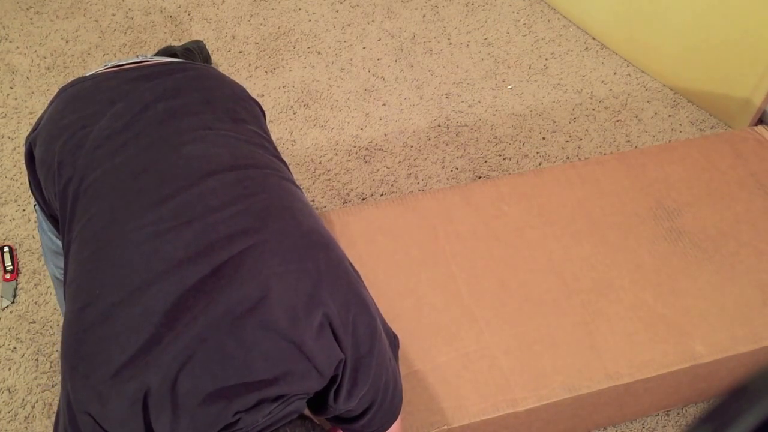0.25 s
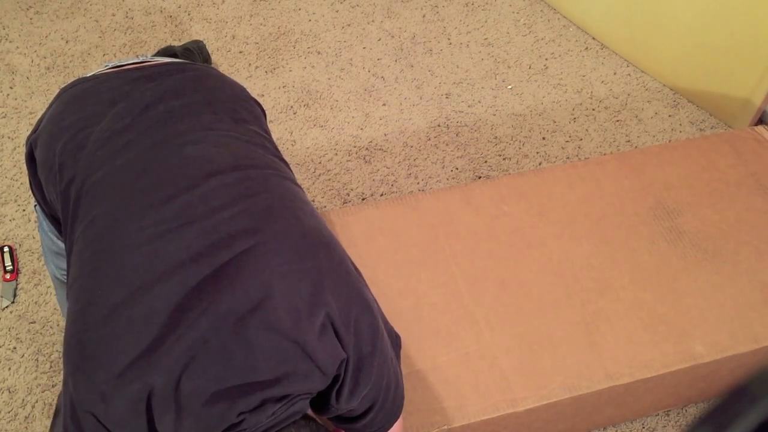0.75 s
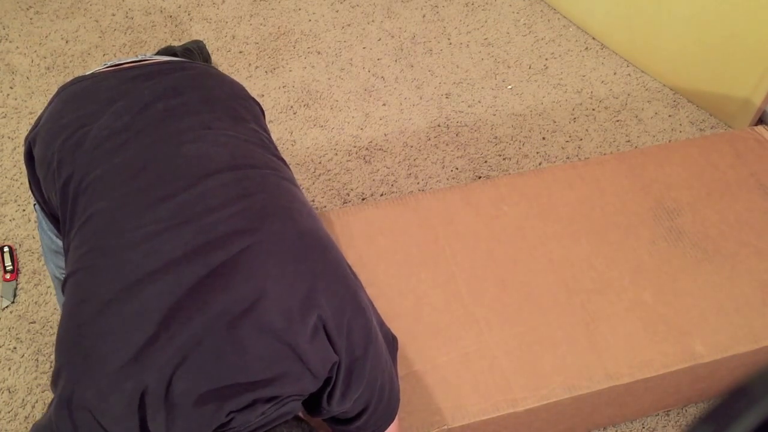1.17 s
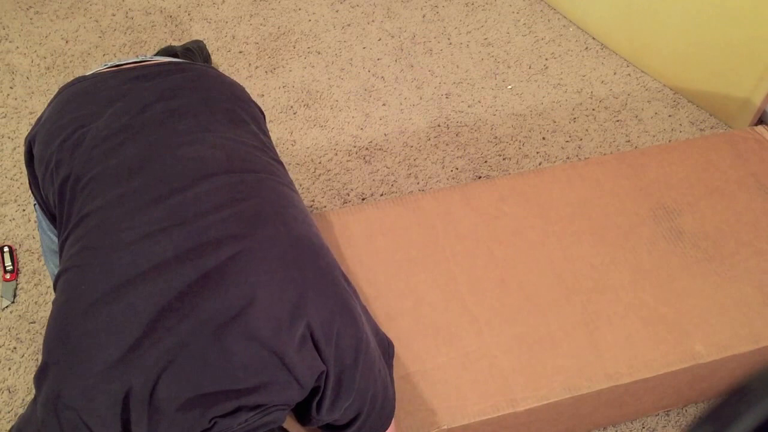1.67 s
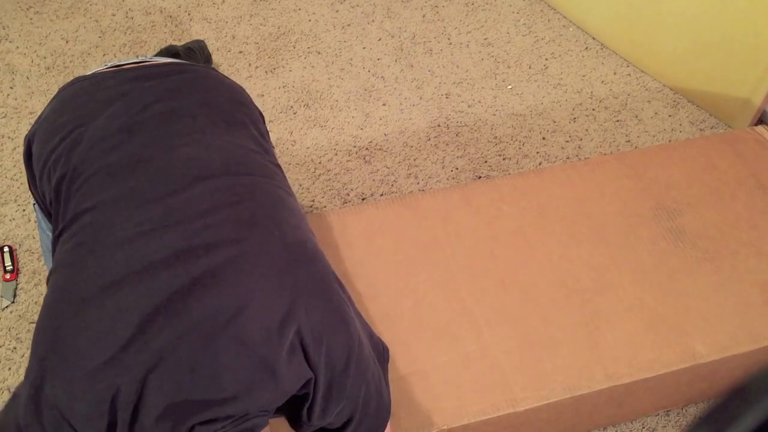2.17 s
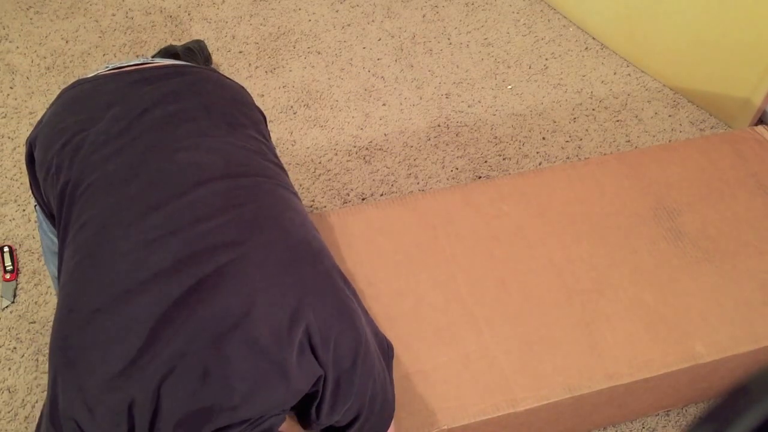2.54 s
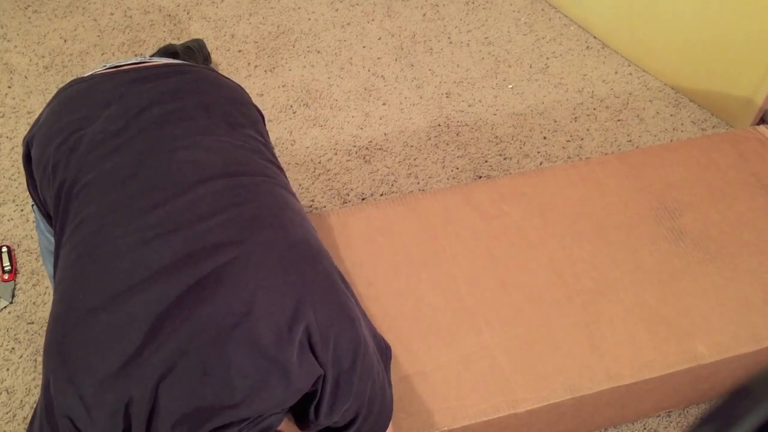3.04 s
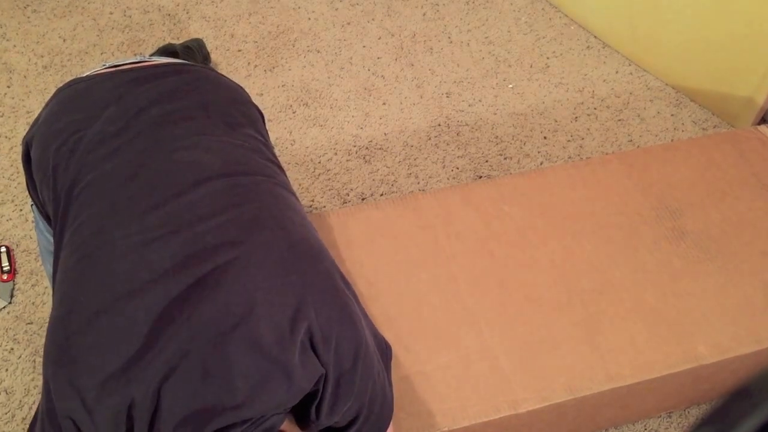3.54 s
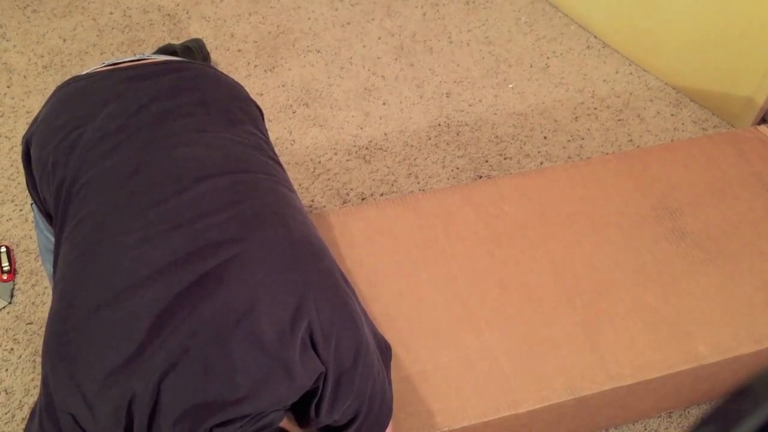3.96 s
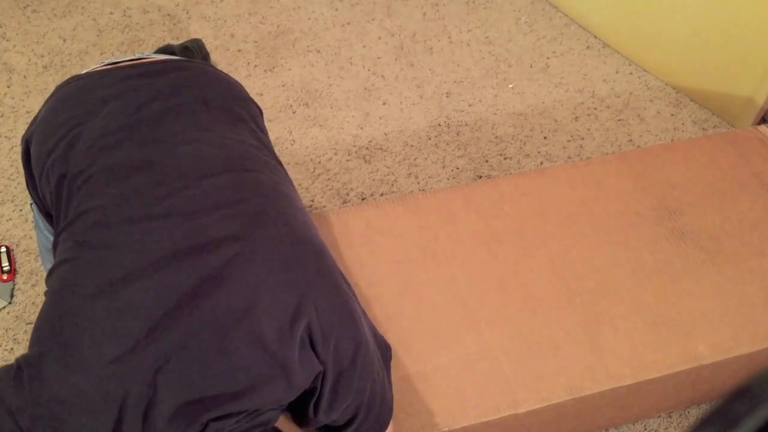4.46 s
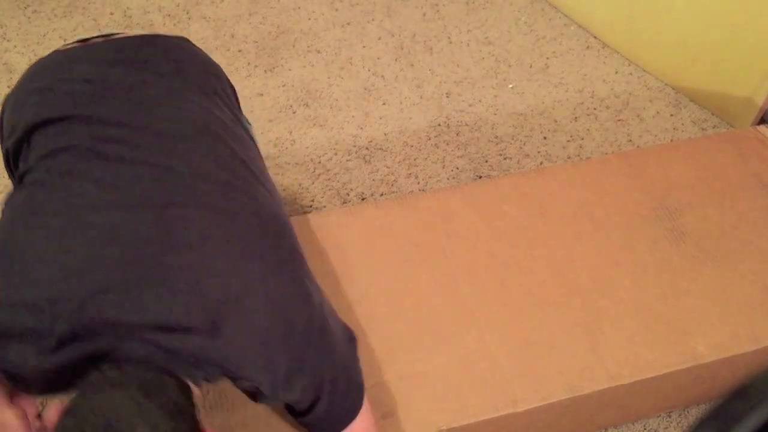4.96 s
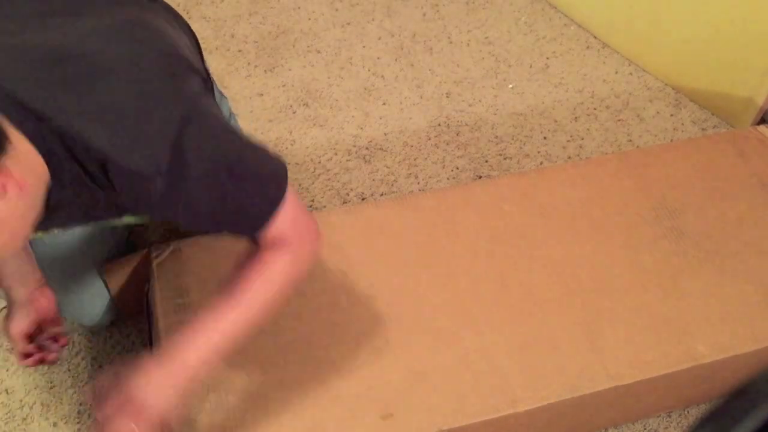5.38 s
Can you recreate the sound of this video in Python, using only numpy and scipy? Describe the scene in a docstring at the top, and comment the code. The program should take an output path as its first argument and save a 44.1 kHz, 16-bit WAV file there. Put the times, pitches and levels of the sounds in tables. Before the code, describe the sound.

Close, dry indoor capture of packing tape being pulled from a long cardboard box. Faint bumps and weak peels come first, then crisp rips just after one second, sparse ticks, a soft deep thump near the middle, a stuttering run of snaps and the loudest tears around four seconds. Loose tape then crinkles brightly. A faint engine drones outside beneath low room hiss.

```python
"""Packing tape is ripped off a long cardboard box in a carpeted room, in smooth pulls and in jerks.
Random slips of the glue crack in the film, rattle the stiff flap and drum on the hollow box.
Soft pushes make the hands bump the board, fine grain makes them scrape, and the arm's tugs sway the box.
Loose tape crinkles in small ringing buckles. A faint engine, two wavering tones, drones far outside,
over the soft hiss and rumble of the room, made from coloured noise."""
import sys
import numpy as np
from scipy import signal
from scipy.fft import rfft, irfft, next_fast_len
from scipy.io import wavfile
from scipy.ndimage import map_coordinates

SR = 44100
rng = np.random.default_rng(int(sys.argv[2]) if len(sys.argv) > 2 else 0)


def put_to_file(sound):
    """Save the sound as 16-bit audio at rate SR, in the file named by the first command-line argument."""
    columns = np.atleast_2d(sound).T  # one column per channel
    safe = np.clip(columns, -1, 1)
    whole_steps = np.round(safe * 32767)
    wavfile.write(sys.argv[1], SR, whole_steps.astype(np.int16))


N = 247842  # length of the scene in samples

# the tape peels in one surge: (start [s], length [s], film level [dB], swell over the surge [dB],
# flap, lid and hollow levels [dB re film], the arm's tug level [dB])
PULL_MOVES = [(0.551, 0.14, -58, -3, -11.5, -10, -0.5, -75), (0.703, 0.094, -47.5, 6, -11, -5.5, -1, -50),
              (0.825, 0.077, -46, 6, -9.5, -4, -3, -61), (1.198, 0.059, -35.5, 4.5, -2, -9, -11, -46),
              (1.268, 0.13, -34.5, -2.5, -8.5, 0.5, -13, -49), (1.668, 0.03, -50, 5, -3, -2, -12, -75),
              (1.711, 0.074, -35, 11.5, -7.5, -4, -13.5, -58),
              (1.82, 0.015, -40, 6, -7.5, -10.5, -11.5, -44), (2.645, 0.052, -51, 3, -16, -5, -12, -75),
              (3.389, 0.03, -39, 3, -11, 4, -11, -58), (3.54, 0.18, -43.5, 0.5, -10.5, -5, -2.5, -42.5),
              (4.141, 0.08, -24.5, 3, 0, 1, -4.5, -49), (4.294, 0.095, -27, 5.5, -7, -6, -8, -47)]
# resonances of the hollow box, the lowest one first: (frequency [Hz], width [Hz], relative level [dB])
HOLLOW_MODES = [(53, 2.2, 2), (76, 9.3, -4), (104.7, 7.3, -2), (141, 21.6, 2.5), (193.9, 24.6, 0)]
# resonances of the lid: (frequency [Hz], width [Hz], relative level [dB])
LID_MODES = [(271, 31.3, 1), (333, 59.4, 0), (445, 80, -2), (556, 72, -3.5), (756, 330, -23.5)]
# tone colour of the stiff flap: (frequency [Hz], relative level [dB])
FLAP_COLOUR = [(300, -11), (620, -16), (730, -5), (850, 5.5), (950, -0.5), (1080, 1), (1300, 1), (1550, -6),
               (2200, -6), (2800, -7), (5000, -19.5), (9000, -44.5)]
# tone colour of the tape film: (frequency [Hz], relative level [dB])
FILM_COLOUR = [(600, -29), (1800, -1.5), (2700, -4), (4200, -1), (5500, -0.5), (7000, 0.5), (8200, -3.5),
               (9600, -1.5), (10500, -5.5), (13000, -3.5), (15500, -9.5)]


def amp(db):
    """Turn decibels into a gain."""
    return 10 ** (np.asarray(db) / 20)


def unit(x):
    """Scale a sound to an average (rms) strength of 1."""
    return x / np.sqrt(np.mean(x ** 2) + 1e-20)


def along(points, hz):
    """Read (frequency [Hz], value) points at any frequency, on a log axis."""
    point_hz, value = np.transpose(points)
    return np.interp(np.log(hz + 1), np.log(point_hz + 1), value)


def wobble(rate):
    """A smooth random curve with this many random points a second."""
    knots = rng.standard_normal(int(N * rate / SR) + 4)
    return map_coordinates(knots, [np.arange(N) * rate / SR])


def add(track, s, sound):
    """Mix a sound into a track at time s."""
    part = track[max(round(s * SR), 0):][:len(sound)]
    part += sound[:len(part)]


def through(x, response):
    """Play x through a body, given that body's answer to one click."""
    return signal.fftconvolve(x, response)[:len(x)]


def colour(points, size=2048):
    """Answer to a click with the given spectrum: it starts at once and has energy 1."""
    level_db = along(points, np.fft.rfftfreq(size, 1 / SR))
    # folding the cepstrum forward in time puts the energy as early as possible (minimum phase)
    cepstrum = irfft(np.log(amp(level_db) + 1e-6))
    cepstrum[1:size // 2] *= 2
    cepstrum[size // 2 + 1:] = 0
    response = irfft(np.exp(rfft(cepstrum)))
    return response / np.linalg.norm(response)


def ringing(modes):
    """Answer to a click of (frequency, width, level) resonances, energy 1; wider ones die sooner."""
    t = np.arange(SR // 2) / SR
    response = np.zeros(len(t))
    for k, (hz, width, db) in enumerate(modes):
        decay = width * np.exp(-np.pi * width * t)
        response += (-1) ** k * amp(db) * decay * np.cos(2 * np.pi * hz * t)
    return response / np.linalg.norm(response)


def slips(rate, scatter_db, clump_rate, clump_db):
    """Tiny random releases, rate a second, of uneven size that come in clumps, rms 1."""
    hit = rng.random(N) < rate / SR
    scatter = scatter_db * np.clip(rng.standard_normal(N), -2, 2)
    clumps = clump_db * np.clip(wobble(clump_rate), -2, 2)
    direction = np.sign(rng.standard_normal(N))
    return unit(hit * direction * amp(scatter + clumps))


def stroke(s, length, db, swell_db, attack, release_db_per_s):
    """Gain of one movement of the hand: a short attack, an even swell, then a release."""
    t = np.arange(N) / SR - s
    swell = swell_db * (np.clip(t / length, 0, 1) - .5)
    release = release_db_per_s * np.maximum(t - length, 0)
    return np.clip(t / attack, 0, 1) * amp(db + swell - release)


def jerk(t60, crack, rate, size=8192):
    """One release, then a dying run of smaller, uneven slips; the briefer the run, the harder the crack."""
    sizes = 0.21 * np.clip(rng.laplace(size=size), -2.5, 2.5)
    fading = amp(-60 * np.arange(size) / SR / t60)
    run = (rng.random(size) < rate / SR) * sizes * fading
    run[0] = crack * (0.05 / t60) ** 0.66  # equals crack when the run dies by 60 dB in 0.05 s
    return run


def air():
    """Steady room tone: noise given the colour of the room."""
    # tone colour of the quiet room: (frequency [Hz], relative level [dB])
    quiet_colour = [(15, -24), (25, -15.5), (77, -18.5), (188, -24.5), (305, -26), (495, -36), (826, -37.5),
                    (895, -42.5), (997, -35), (1110, -42), (2010, -41.5), (9300, -50), (15500, -55)]
    return amp(-64.5) * unit(through(rng.standard_normal(N), colour(quiet_colour)))


def engine():
    """Only the lowest two orders pass the walls; the engine settles to idle, then climbs evenly."""
    # loudness of the lower tone before its small random wobble: (time [s], level [dB])
    drone_level = [(0, -64), (0.8, -60.5), (2.1, -62), (3.25, -50.5), (5.62, -72.5)]
    idle_hz, over_idle_hz, settle_s = 55.3, 11, 0.27
    pickup_s, climb_hz_per_s = 2.4, 9.6
    t = np.arange(N) / SR
    settling = over_idle_hz * np.exp(-t / settle_s)
    climb = climb_hz_per_s * np.maximum(t - pickup_s, 0)
    hz = idle_hz + settling + climb
    phase = 2 * np.pi * np.cumsum(hz * (1 + 0.0097 * wobble(2.0))) / SR
    first_db = np.interp(t, *np.transpose(drone_level)) + 1.0 * wobble(4)
    second_db = -73 + 1.8 * wobble(1.3)
    # the root of 2 makes these levels rms levels
    return np.sqrt(2) * (amp(first_db) * np.sin(phase) + amp(second_db) * np.sin(2 * phase))


def room(x, wet_db, count=26):
    """Board and walls answer within milliseconds; the answer drifts between random tails at a steady pace."""
    # how long the room rings: (frequency [Hz], time to die by 60 dB [s])
    decay_times = [(100, 0.34), (260, 0.25), (700, 0.18), (1840, 0.2), (4850, 0.25), (12800, 0.24)]
    hop = N // count + 1
    fade = np.sin(np.pi * np.arange(2 * hop) / (2 * hop))  # the squares of overlapping fades add up to 1
    padded = np.pad(x, (hop, 2 * hop))
    out = np.zeros(len(padded))
    # each tail is noise that dies at its own speed in each frequency band
    hz, t, bands = signal.stft(rng.standard_normal((count + 1, SR // 3)), SR, nperseg=256)
    fading = amp(-60 * t / along(decay_times, hz)[:, None])
    tails = signal.istft(bands * fading, SR, nperseg=256)[1]
    # near surfaces answer first and strongest
    tails *= 1 + np.exp(-np.arange(tails.shape[1]) / SR / 0.0023)
    for k, tail in enumerate(tails):
        piece = padded[k * hop:][:2 * hop] * fade
        add(out, k * hop / SR, signal.fftconvolve(piece, tail / np.linalg.norm(tail)))
    wet = amp(wet_db) * out[hop:hop + N]
    return (x + wet) / np.hypot(1, amp(wet_db))


def bumps():
    """A soft push on the box; the softer it is, the fewer resonances it reaches."""
    # (time [s], level before the gain below [dB], hardness as a cut-off before a 1 % rise [Hz])
    pushes = [(0.209, -42.5, 124), (0.313, -41, 380), (0.337, -58, 186), (0.358, -38, 182),
              (2.415, -29, 126), (2.794, -19.5, 180), (3.13, -36, 353), (3.953, -26.5, 108)]
    force, t = np.zeros(N), np.arange(SR // 20) / SR
    for s, db, hz in pushes:
        push = t * np.exp(-2 * np.pi * hz * 1.01 * t)
        add(force, s, amp(db + 24.0) * push / push.sum())
    hollow = through(force, ringing(HOLLOW_MODES))
    lid = through(amp(5.5) * force, ringing(LID_MODES))
    flap = through(amp(-2.0) * force, colour(FLAP_COLOUR))
    return hollow + lid + flap


def scrapes():
    """Skin drags over the board in many tiny slips, a fine grain."""
    # hands slide on the board: (start [s], length [s], level [dB], swell over the slide [dB])
    slides = [(0.319, 0.025, -57, 6), (2.42, 0.089, -53.5, 13)]
    # tone colour of the rubbed board: (frequency [Hz], relative level [dB])
    rubbed_colour = [(120, -34), (330, -2.5), (520, -3.5), (750, -11.5), (1050, -8), (1800, -16.5),
                     (3000, -27), (7000, -32), (15000, -42)]
    strength = sum(stroke(*slide, attack=0.012, release_db_per_s=422) for slide in slides)
    grain = slips(rate=3500, scatter_db=3, clump_rate=150, clump_db=3)
    return through(strength * grain, colour(rubbed_colour))


def loose_tape():
    """Each buckle rings a facet of the strip; fine creases crackle in between once it is balled up."""
    # loose tape buckles: (time [s], level before the gains below [dB], ring [Hz],
    # bright edge before its gain [dB re ring], time for the run-on to die by 60 dB [s])
    buckles = [(0.095, -65, 3170, -18, 0.038), (0.492, -76, 2280, 15, 0.073), (1.027, -62, 3340, 15, 0.081),
               (1.148, -52, 2360, -22, 0.077), (1.1713, -39, 2390, -13, 0.18), (1.587, -48, 2780, -9, 0.13),
               (1.6688, -50, 3760, 4, 0.031), (2.0128, -57, 3100, -21, 0.03), (2.05, -60, 3620, 1, 0.077),
               (2.392, -46, 1680, -12, 0.029), (3.086, -67.5, 2320, 11, 0.15),
               (4.5533, -42.5, 2750, 7.5, 0.11), (4.5923, -32.5, 3570, -6, 0.024),
               (4.658, -46, 2430, -15.5, 0.018), (4.7178, -47.5, 1600, -14.5, 0.015),
               (4.732, -42, 2860, -7, 0.036), (4.7916, -37.5, 2560, -8, 0.022),
               (4.825, -40, 3300, -9, 0.016), (4.8391, -42, 3650, -2.5, 0.0098),
               (4.896, -51, 2510, 3, 0.02), (4.9701, -53, 2000, 0, 0.028),
               (5.008, -55.5, 2800, -12.5, 0.03), (5.061, -45.5, 2150, 7.5, 0.058),
               (5.1622, -47, 2170, -11, 0.031), (5.3373, -55.5, 2425, 9, 0.053),
               (5.5916, -43, 2290, -19.5, 0.18)]
    # tone colour of the creasing loose tape: (frequency [Hz], relative level [dB])
    crease_colour = [(290, -39), (500, -24.5), (676, -13), (803, -12), (1560, -8), (1750, -8), (2500, 1),
                     (3380, -0.5), (4910, -6.5), (12000, -16.5), (15500, -24.5)]
    facet_width_hz, facet_gain_db, edge_gain_db = 750, 23.5, 21.5
    crumple_s = 4.55  # from here on the strip is balled up
    attack_s, release_db_per_s = 0.014, 294
    facets, edges = np.zeros((2, N))
    creasing = stroke(crumple_s, 0.63, -58.5, -3.5, attack_s, release_db_per_s)
    for s, db, hz, edge_db, t60 in buckles:
        run = jerk(t60, crack=0.72, rate=1800)
        ring = through(run, ringing([(hz, facet_width_hz, 0)]))
        add(facets, s, amp(db + facet_gain_db) * ring)
        add(edges, s, amp(db + edge_db + edge_gain_db) * run)
        if s >= crumple_s:  # fine creases trail each buckle of the balled strip
            creasing += stroke(s, attack_s, db - 5.5, 0, attack_s, release_db_per_s)
    creases = creasing * slips(rate=650, scatter_db=4, clump_rate=110, clump_db=9.0)
    return facets + through(edges, colour(FILM_COLOUR)) + through(creases, colour(crease_colour))


def tugs():
    """The arm's unsteady force sways the whole box in its lowest mode, however loud the tape is."""
    force = np.zeros(N)
    for s, length, *_, tug_db in PULL_MOVES:
        force += stroke(s, length, tug_db, 0, attack=0.034, release_db_per_s=298)
    return force * unit(through(rng.standard_normal(N), ringing(HOLLOW_MODES[:1])))


def carton(film, flap, lid, hollow):
    """Each force is heard through its own body; the board is mixed in with opposite sign to the film."""
    board = through(flap, colour(FLAP_COLOUR))
    board += through(lid, ringing(LID_MODES))
    board += through(hollow, ringing(HOLLOW_MODES[1:]))  # the lowest mode is left to the tugs and bumps
    return through(film, colour(FILM_COLOUR)) - board


def stutter(count=6):
    """The tape catches and slips at an even beat, hardest past the middle; the board shakes unevenly."""
    start_s, period_s, peak_s, half_s = 3.4668, 0.0388, 3.61, 0.25
    peak_db, sag_db = -30.5, 4.5  # the level sags by sag_db at half_s away from the peak
    scatter_db = 2.5 * rng.standard_normal((count, 2))
    rows = []  # same columns as the jerks in snaps()
    for k, (flap_db, box_db) in enumerate(scatter_db):
        s = start_s + k * period_s
        db = peak_db - sag_db * ((s - peak_s) / half_s) ** 2
        rows.append((s, db, -0.5 + flap_db, 3.5 + box_db, 0.061))
    return rows


def snaps():
    """A jerk cracks the film and shakes the board; the briefer it is, the harder its first crack."""
    # the tape lets go with a jerk and runs on: (time [s], film level before the gains below [dB],
    # flap and box levels before their gains [dB re film], time for the run-on to die by 60 dB [s])
    jerks = [(0.6262, -37.5, -17, -10, 0.059), (1.1996, -39.5, -3.5, 5, 0.044),
             (1.2253, -43, 13.5, 19, 0.08), (1.7165, -44.5, -2, 8, 0.06), (1.8414, -34, -4, -12.5, 0.063),
             (2.648, -55, -35, -15, 0.042), (2.7391, -36.5, -3, 4.5, 0.034), (2.788, -36.5, 3, 9, 0.03),
             (3.3736, -44.5, 4, 6, 0.09), (3.3932, -34, -4.5, -1.5, 0.046), (3.425, -41, 0, 9.5, 0.04),
             (3.488, -31, -1, 6, 0.08), (3.692, -33.5, 2, 2.5, 0.09), (3.8112, -47.5, -6, -9, 0.18),
             (3.8936, -42, -16.5, -12, 0.022), (3.9832, -31, -5.5, -8.5, 0.052),
             (4.042, -44, -10, -5.5, 0.0067), (4.048, -28.5, 3.5, -1.5, 0.035),
             (4.1124, -43, -22, -16.5, 0.015), (4.1385, -42, -5.5, -5.5, 0.031),
             (4.1462, -27, 7, 3.5, 0.079), (4.2989, -35, -7.5, 4, 0.035)]
    film_gain_db, flap_gain_db, box_gain_db, hollow_db = 25.5, 22.5, 20.5, -3.5
    shove_share, shove_t60_s = 0.74, 0.057
    film, flap, box = np.zeros((3, N))
    for s, db, flap_db, box_db, t60 in list(jerks) + stutter():
        run = jerk(t60, crack=0.85, rate=2300)
        add(film, s, amp(db + film_gain_db) * run)
        # the heavy board takes most of its blow from the first release
        shove = run * (shove_share + amp(-60 * np.arange(len(run)) / SR / shove_t60_s))
        add(flap, s, amp(db + flap_db + flap_gain_db) * shove)
        add(box, s, amp(db + box_db + box_gain_db) * shove)
    return carton(film, flap, lid=box, hollow=amp(hollow_db) * box)


def pulls():
    """Glue strands and paper fibres part in a dense, uneven stream."""
    attack_s, release_db_per_s = 0.014, 375.5
    hollow_release_db_per_s = 225.5  # the hollow box settles later
    strength = np.zeros((4, N))  # film, flap, lid, hollow
    for s, length, db, swell_db, flap_db, lid_db, hollow_db, _ in PULL_MOVES:
        board_swell_db = 0.52 * swell_db  # the board swells less than the film
        film = stroke(s, length, db, swell_db, attack_s, release_db_per_s)
        board = stroke(s, length, db, board_swell_db, attack_s, release_db_per_s)
        hollow = stroke(s, length, db, board_swell_db, attack_s, hollow_release_db_per_s)
        strength += [film, amp(flap_db) * board, amp(lid_db) * board, amp(hollow_db) * hollow]
    strength *= amp(1 * wobble(35))  # the grip of the glue varies along the strip
    stream = slips(rate=3600, scatter_db=4.5, clump_rate=380, clump_db=2.0)
    return carton(*strength * stream)


def scene():
    """The work on the box, heard in the room, with the sway of the box, the engine and the room tone."""
    work = pulls() + scrapes() + snaps() + bumps() + loose_tape()
    return (room(work, wet_db=0.0) + tugs() + engine() + air())[None]


def record(dry):
    """The microphone sheds the deepest bass; nothing is kept above the top frequency."""
    top_hz = 15520
    size = next_fast_len(N + SR // 2)
    hz = np.fft.rfftfreq(size, 1 / SR)
    low_cut = signal.butter(4, 42, "high", fs=SR, output="sos")
    spectrum = rfft(signal.sosfilt(low_cut, dry), size)
    return irfft(spectrum * (hz < top_hz), size)[:, :N]


dry = scene()
out = record(dry)
put_to_file(out)
```